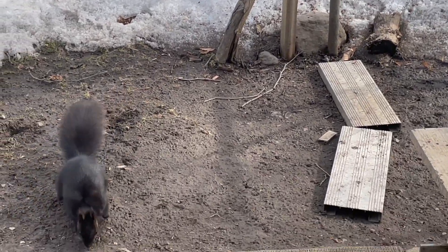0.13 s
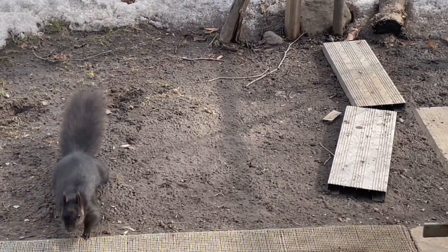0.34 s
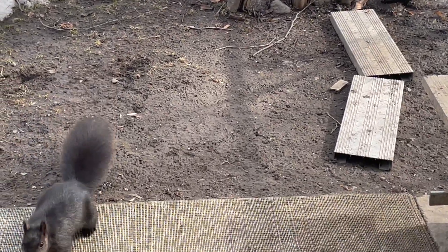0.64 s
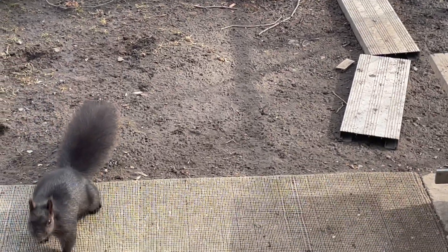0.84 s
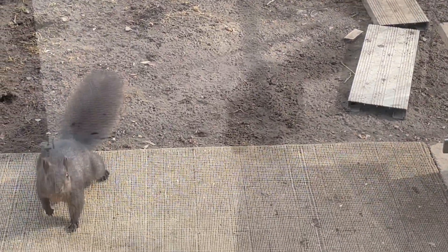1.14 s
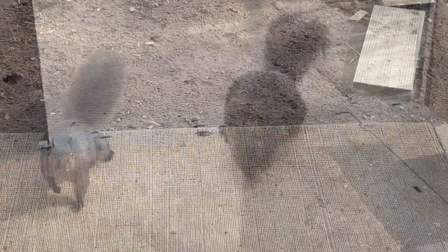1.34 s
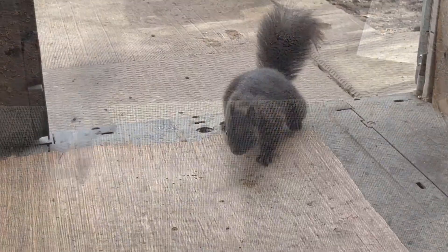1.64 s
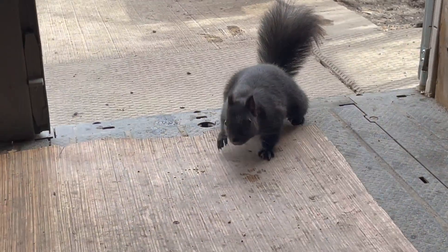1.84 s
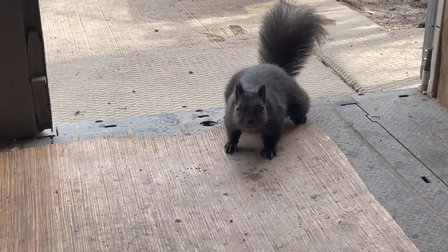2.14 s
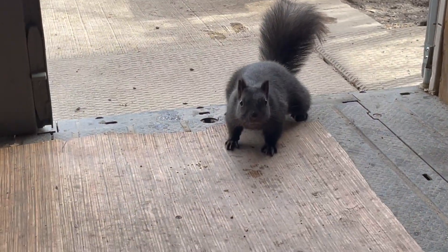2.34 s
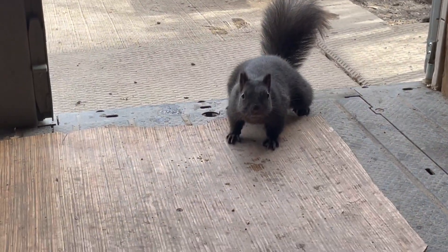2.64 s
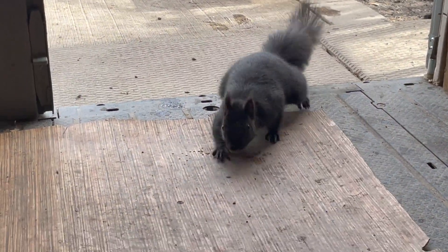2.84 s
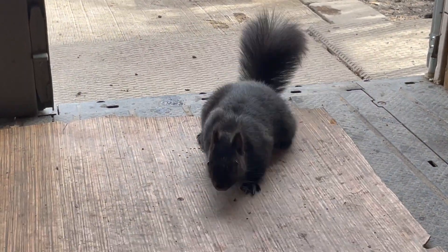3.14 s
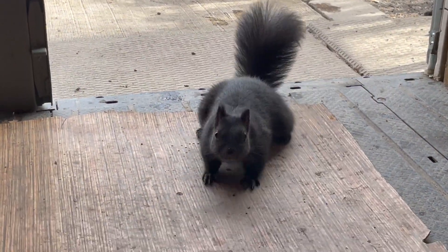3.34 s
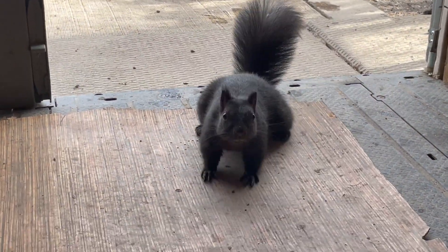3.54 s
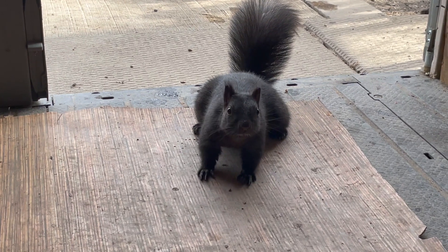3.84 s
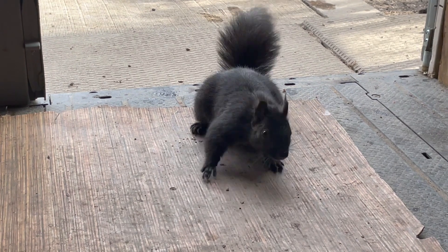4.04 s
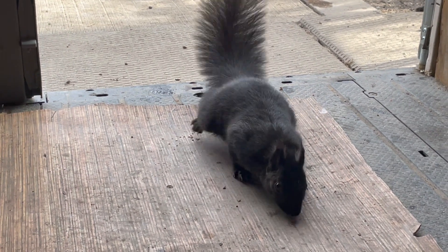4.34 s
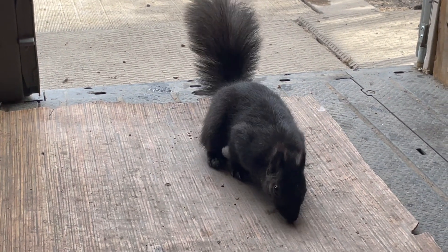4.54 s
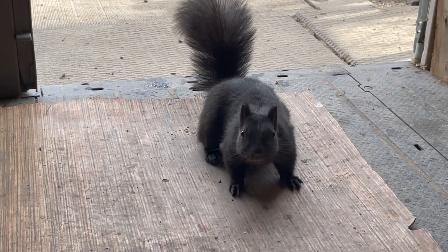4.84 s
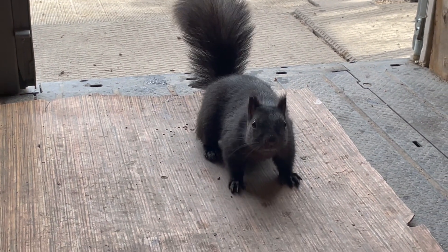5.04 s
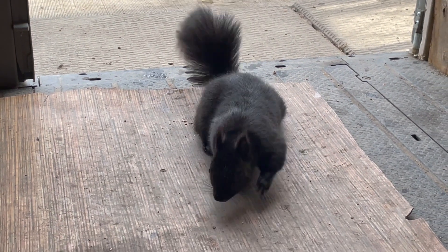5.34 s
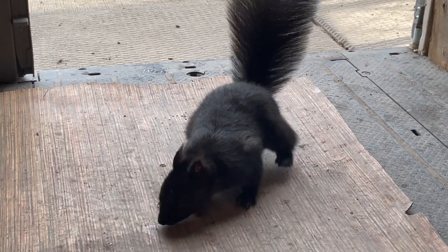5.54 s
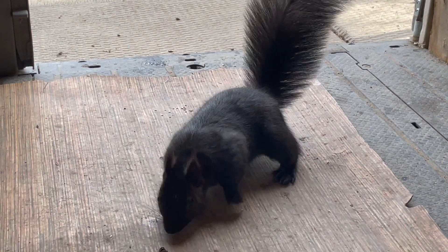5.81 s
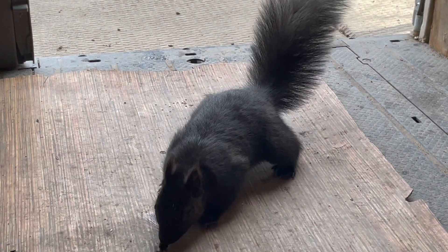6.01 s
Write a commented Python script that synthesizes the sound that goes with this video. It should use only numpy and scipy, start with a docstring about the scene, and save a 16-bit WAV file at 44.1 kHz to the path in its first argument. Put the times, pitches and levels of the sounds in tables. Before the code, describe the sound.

Close stereo pickup of a squirrel: a sharp scratch, a pause, then a dense flurry of gritty claw ticks. After that, irregular soft paw thumps ring a wooden board in a small shed, with occasional claw clicks. Behind it sit quiet traffic wash and low rumble, an engine rising and falling mid-way, then a beating bass drone and tiny distant chirps.

```python
"""Squirrel in a shed door

A squirrel close to a two-port microphone scrabbles over soil and a ribbed mat, then hops on a plywood floor.
Paws are noisy rolls of knocks that ring the board's modes; claws are dense filtered ticks; the shed adds a tail.
Outside, beating tones and wavering engine orders drone and rev past over shaped-noise rumble, traffic wash
and hiss; faint far chirps are short bursts of noise in a loose band."""
import sys
import numpy as np
from scipy import signal
from scipy.fft import rfft, irfft
from scipy.io import wavfile

SR = 44100
rng = np.random.default_rng(int(sys.argv[2]) if len(sys.argv) > 2 else 0)


def makeup_ratio(level_db):
    """Linear amplitude ratio for a level in decibels (20 dB per factor of ten)."""
    decades = np.asarray(level_db, float) / 20
    return 10 ** decades


def transcribe(signal):
    """Save signal, clipped to [-1, 1], as a 16-bit WAV file at the path in sys.argv[1]."""
    frames = np.atleast_2d(signal).T
    limited = np.clip(frames, -1, 1)
    pcm = np.round(limited * 32767).astype(np.int16)
    wavfile.write(sys.argv[1], SR, pcm)


N = 272124   # length in samples

# The outdoors. Each row: time in seconds, then levels in dB of rumble, exhaust roar, the lower band of
# traffic wash, and rustle.
OUTDOOR_LEVELS = [(0.0, -50, -67.5, -58.5, -65), (0.31, -54.5, -56, -62, -79),
                  (0.8, -54, -60.5, -64, -79.5), (1.0, -58.5, -58, -62, -62),
                  (1.3, -54, -61.5, -63.5, -79.5), (1.58, -62, -60, -61.5, -80),
                  (1.74, -53, -53.5, -58.5, -69), (1.95, -53.5, -59, -69, -80), (2.4, -55, -58, -61, -76),
                  (2.56, -43, -56.5, -56, -70), (2.94, -43, -49, -55, -67), (3.4, -45, -59.5, -59, -76),
                  (3.6, -50, -54.5, -61, -78.5), (3.7, -51.5, -62, -71, -80),
                  (4.11, -52.5, -59.5, -68, -78.5), (4.5, -50.5, -59.5, -66.5, -80),
                  (5.26, -47, -59, -68.5, -81.5), (5.4, -49, -54.5, -68, -68.5),
                  (5.59, -46, -61.5, -66.5, -80.5), (6.17, -50.5, -57, -69.5, -81)]
# Spectra of the outdoor layers. Each row: frequency in Hz, relative density in dB per Hz.
RUMBLE_SPECTRUM = [(22, -23), (35, -8), (55, 2), (80, 2.5), (105, -6.5), (150, -13.5)]
ROAR_SPECTRUM = [(80, -16.5), (125, -1), (190, -2), (280, -8.5), (420, -12), (650, -33.5)]
WASH_SPECTRUM = [(300, -1), (480, 3.5), (800, 2.5), (1200, -4), (1700, -6), (2400, -13), (3500, -22.5),
                 (6000, -29.5)]
HISS_SPECTRUM = [(880, -37), (1500, -10.5), (2300, -3), (3400, -5.5), (4700, -7.5), (6600, -7.5),
                 (7000, -22), (8000, -22), (8500, -13), (10500, -15), (12300, -18), (13200, -34),
                 (15500, -41.5)]
STEADY_HISS_DB = -86   # hiss that never changes

# A deep drone of two neighbouring tones that beat. Each row: time in seconds, lower and upper tone in Hz,
# lower and upper level in dB.
DRONE_TONES = [(1.3, 47.5, 59.6, -72, -57), (1.8, 50.1, 58.8, -56, -54.5), (2.2, 50.4, 63.4, -44.5, -69),
               (2.43, 49.9, 63.6, -52.5, -52), (2.55, 50.5, 66.46, -41.5, -41),
               (2.95, 51.94, 68.85, -65, -53.5), (3.3, 52.6, 64.12, -57, -46.5),
               (3.55, 52.75, 59.05, -45.5, -60), (4.1, 53, 58.6, -72, -60),
               (4.3, 53.43, 58.4, -47.5, -47.5), (5.0, 53.21, 58.84, -46.5, -45.5),
               (5.6, 52.8, 58.6, -50.5, -43.5), (6.17, 51.7, 56.7, -61, -57)]
IN_STEP_S = 4.84   # a moment at which the two tones are in step
# Engine revving past outside. Each row: time in seconds, firing rate in Hz, common level of its orders in dB.
ENGINE_REVS = [(1.6, 44.73, -57), (1.92, 45.52, -63), (2.16, 48.8, -52.5), (2.28, 46.93, -51.5),
               (2.78, 62.14, -50), (2.85, 67.9, -67), (2.95, 68.9, -68), (3.43, 59, -55.5),
               (3.58, 52.3, -50.5), (3.7, 50.06, -63)]
# Engine orders. Each row: multiple of the firing rate, level in dB relative to the common level.
ENGINE_ORDERS = [(2, 0.5), (3, -4.5), (4, -13)]
# A far motor that fades out. Each row: time in seconds, level in dB.
HUM_LEVEL = [(0, -72), (1.3, -67.5), (1.6, -81), (6.17, -88)]
HUM_HZ = 197.8
# Faint far chirps. Each row: time in seconds (10 ms after the onset), peak in dB, pitch in Hz.
FAR_CHIRPS = [(1.4895, -57, 2150), (1.6228, -52, 2560), (1.761, -53, 2100), (1.9412, -56, 2480),
              (2.049, -55.5, 2670), (2.1974, -58, 2970), (4.4454, -59, 2420), (4.7234, -55, 2480),
              (4.8738, -59.5, 2530), (4.921, -56, 2470), (5.0672, -61, 2500), (5.19, -61.5, 2460),
              (5.6084, -64, 2370)]
CHIRP_S = 0.047

# Diffuse sound at the two microphone ports. Each row: frequency in Hz, side gain in dB.
PORT_SPREAD = [(60, -16.5), (160, -9.5), (450, -5), (2000, -3), (3200, -11.5), (4000, -20), (6500, -31),
               (6950, 15), (8000, 9), (9800, -4.5), (10800, -19.5), (12200, -23), (13200, 16.5),
               (16000, 12)]
# Near sound at the two microphone ports. Each row: frequency in Hz, phase in radians by which left leads.
PORT_LEAD = [(100, -1.5), (700, 0.5), (1700, 1), (2600, 0), (6500, 0.2), (6850, 4.5), (7600, 5), (9000, 2),
             (10500, -0.2), (12300, -11.2), (13200, -1.5), (14200, -2.5), (16000, 0)]
SHED_T60_S, SHED_DB = 0.2, -13

# Claws on a rough surface. Each row: frequency in Hz, relative density in dB per Hz.
CLAW_SPECTRUM = [(300, -1.5), (585, -5.5), (1070, -0.5), (1300, -8.5), (2200, -3), (3430, -2.5), (4500, -3),
                 (6500, -7), (7400, -19), (8400, -8), (11400, -21), (13000, -17), (14000, -32),
                 (15400, -27), (16200, -47)]
# Claws catching briefly. Each row: peak time in seconds, level in dB, brightest frequency in Hz,
# top-octave level in dB (-16.5 leaves the plain claw spectrum).
CLAW_TICKS = [(0.0111, -49, 3570, -16), (0.0832, -56, 6400, -15), (0.2262, -50, 6500, -16),
              (0.2615, -33, 2970, -16.5), (0.4382, -52, 5030, -12.5), (0.6431, -50.5, 3430, -7.5),
              (0.8277, -39, 4540, -23), (0.892, -39.5, 3260, -19.5), (0.9851, -38.5, 3940, -12.5),
              (1.0253, -36.5, 2940, -19), (1.028, -38.5, 1674, -35.5), (1.04, -42.5, 5900, 0),
              (1.0495, -42, 3280, -27), (1.0851, -40.5, 9100, 2), (1.1599, -49, 5900, -11),
              (1.1918, -55.5, 10930, 1), (1.236, -61, 5630, -5), (1.282, -55.5, 2040, -19),
              (1.3225, -68, 1690, -11), (1.596, -58, 1840, -16), (1.622, -58, 2580, -9.5),
              (1.868, -50, 2180, -15), (2.9088, -45.5, 2500, -11.5), (3.3218, -58, 1706, -7),
              (4.0985, -49, 1978, -32), (4.1848, -55.5, 2130, -17.5), (4.4157, -52.5, 2490, -27),
              (4.651, -61, 3600, -33), (5.2967, -46, 4580, -11), (5.306, -49, 2170, -30),
              (5.329, -52, 2540, -40), (5.4432, -44, 4250, -15), (5.5734, -57.5, 2210, -14),
              (5.765, -55, 2620, -14.5)]
TICK_RISE_MS, TICK_FADE_MS = 5.0, 37
# Claws dragging. Each row: peak time in seconds, level in dB, brightest frequency in Hz, rise in ms,
# fade to -60 dB in ms.
CLAW_DRAGS = [(0.099, -53.5, 3480, 7.8, 150), (0.1255, -44.5, 7200, 43, 66), (0.1472, -44, 5560, 15.2, 89),
              (0.164, -35, 6800, 32.6, 35), (0.19, -47, 4500, 39, 44), (0.6287, -54.5, 2430, 18.3, 140),
              (0.8591, -51.5, 3860, 2.76, 310), (0.9375, -38, 5600, 17, 34), (0.9519, -43, 4150, 34, 48),
              (1.0775, -32.5, 11000, 16.6, 64), (1.1269, -50, 6000, 9, 84), (2.7458, -52, 5760, 13.4, 51),
              (2.8348, -52, 2990, 5.6, 190), (2.9464, -52, 3380, 17, 390), (2.96, -35, 1850, 15.6, 24),
              (3.994, -66, 2620, 28, 130), (4.694, -63, 2130, 56, 99), (5.3596, -61.5, 2400, 18, 56),
              (5.4, -56.5, 2800, 22, 88), (5.439, -47.5, 5500, 10.4, 39), (5.484, -63.5, 5820, 30, 180)]
DRAG_TOP_DB, SQUEAK_HZ, SQUEAK_DB = -15, 8000, 11   # drags brighter than SQUEAK_HZ gain SQUEAK_DB on top
STRAYS, STRAY_DB, STRAY_HZ = 12, -65.5, 2370   # faint scuffs: number, loudest level, central pitch

# Paws landing on the board. Each row: landing in seconds, peak of the push in dB, favoured low pitch in Hz,
# peaks of the middle modes and of the claw-tip modes in dB relative to the push.
PAW_LANDINGS = [(1.723, -52, 231, -26, -6), (1.867, -37.5, 345, -10, -21), (2.844, -25.5, 288, -11.5, 2.5),
                (2.942, -28.5, 275, -19, -14), (3.023, -25.5, 234, -4.5, -6), (3.325, -27, 294, -18, -17.5),
                (3.562, -44.5, 228, -5.5, -6), (3.983, -41, 282, -4, -13.5), (4.1, -31, 280, 1, -1),
                (4.278, -40, 349, -1, -5), (4.289, -35.5, 203, -7.5, -12.5), (4.41, -23.5, 276, -13, -22),
                (4.784, -30.5, 232, -15, -23.5), (5.372, -28.5, 239, -4, 0), (5.503, -25.5, 355, -14, -11),
                (5.575, -37.5, 222, 0.5, -6), (5.858, -30, 420, -4.5, -14)]
# Plywood modes: 7 low, 8 middle, the rest high. Each row: nominal frequency in Hz, nominal level in dB,
# free ring time (t60) in seconds.
BOARD_MODES = [(136, 2, 0.062), (178.7, 0.5, 0.058), (230.5, 0, 0.066), (280, 1.5, 0.075),
               (335, -2.5, 0.04), (349, -0.5, 0.17), (408, -1, 0.097), (485, 1.5, 0.032), (550, -2.5, 0.1),
               (599, -1.5, 0.069), (720, -5.5, 0.025), (785, -9, 0.034), (918, -1, 0.017), (929, -6, 0.035),
               (1056, -14.5, 0.051), (1172, -13, 0.054), (1363, -4.5, 0.071), (1621, 0, 0.038),
               (1850, -3, 0.032), (2130, -1.5, 0.011), (2365, -5, 0.035), (2588, -2, 0.035),
               (2894, -6, 0.029), (3170, -7.5, 0.022)]
RING_CYCLES, DAMPED_S = 15, 0.01   # the resting paw caps a ring at this many cycles plus this time
TIP_LOW_HZ, TIP_HIGH_HZ = 1450, 2100   # range of the pitch that a claw tip favours
BOARD_PAN_DB = -2.5   # left relative to right: the board lies a little to the right


def at_hz(points, hz):
    """Read a spectrum table on a log-frequency axis."""
    p = np.array(points)
    return np.interp(np.log(hz + 1), np.log(p[:, 0] + 1), p[:, 1])


def in_time(rows):
    """Columns of a curve table, one value a sample."""
    s, *columns = np.transpose(rows)
    return [np.interp(np.arange(N) / SR, s, c) for c in columns]


def drift(corner_hz):
    """Slow random wander of spread 1: noise through two equal low-pass poles, drawn every 40 samples."""
    r = np.exp(-2 * np.pi * corner_hz * 40 / SR)
    noise = rng.standard_normal(N // 40 + 2002)
    slow = signal.lfilter([1], [1, -2 * r, r * r], noise)[2000:]   # skip the filter's settling
    slow /= np.sqrt(np.mean(slow ** 2))
    return np.interp(np.arange(N) / 40, np.arange(len(slow)), slow)


def ring(x, hz, t60):
    """A resonator: a unit click sets a decaying sine of starting height 1 ringing."""
    r, w = makeup_ratio(-60 / (t60 * SR)), 2 * np.pi * hz / SR
    return signal.lfilter([0, np.sin(w)], [1, -2 * r * np.cos(w), r * r], x)


def add(out, s, sound, peak_db):
    """Lay a sound into the track at its moment and peak."""
    i = max(round(s * SR), 0)
    part = sound[:N - i] * makeup_ratio(peak_db) / np.max(np.abs(sound))
    out[..., i:i + len(part)] += part


def minimum_phase(gain):
    """The causal filter with this gain, by folding the cepstrum."""
    cepstrum = irfft(np.log(gain + 1e-6))
    cepstrum[1:len(gain) - 1] *= 2
    cepstrum[len(gain):] = 0
    return np.exp(rfft(cepstrum))


def spread(mid_side):
    """Left and right from two unrelated signals, the side coloured by the microphone ports."""
    side_gain = makeup_ratio(at_hz(PORT_SPREAD, np.fft.rfftfreq(N, 1 / SR)))
    mid, side = mid_side[0], irfft(rfft(mid_side[1]) * side_gain, N)
    return np.array([mid + side, mid - side])


def diffuse(spectrum, patchy_db):
    """Shaped noise from all round, mid rms 1 before its level flickers by patchy_db."""
    hz = np.fft.rfftfreq(N, 1 / SR)
    low_cut = np.minimum(hz / spectrum[0][0], 1) ** 3
    shape = makeup_ratio(at_hz(spectrum, hz)) * (hz < spectrum[-1][0]) * low_cut
    noise = irfft(rfft(rng.standard_normal((2, N))) * shape, N)
    return makeup_ratio(patchy_db * drift(9.4)) * spread(noise / np.std(noise[0]))


def outdoors():
    """Rumble, exhaust roar, traffic wash and hiss: bands of diffuse noise, each following its level curve."""
    rumble_db, roar_db, wash_db, rustle_db = in_time(OUTDOOR_LEVELS)
    rumble = makeup_ratio(rumble_db) * diffuse(RUMBLE_SPECTRUM, patchy_db=0.0)
    roar = makeup_ratio(roar_db) * diffuse(ROAR_SPECTRUM, patchy_db=2.2)
    wash_low = diffuse(WASH_SPECTRUM[:4], patchy_db=1.2)
    wash_high = diffuse(WASH_SPECTRUM[3:], patchy_db=2.2)
    wash = makeup_ratio(wash_db) * (wash_low + 0.7 * wash_high)
    hiss_level = np.hypot(makeup_ratio(rustle_db), makeup_ratio(STEADY_HISS_DB))   # powers add
    return rumble + roar + wash + hiss_level * diffuse(HISS_SPECTRUM, patchy_db=0.4)


def far_hum():
    """A far motor: one steady tone with slight wander in level and phase."""
    t = np.arange(N) / SR
    level = makeup_ratio(in_time(HUM_LEVEL)[0] + 2.5 * drift(5.7))
    return np.sqrt(2) * level * np.sin(2 * np.pi * HUM_HZ * t + 0.5 * drift(7.2))


def drone():
    """Two neighbouring low tones throb as they slip in and out of step."""
    low_hz, high_hz, low_db, high_db = in_time(DRONE_TONES)
    phase = 2 * np.pi * np.cumsum([low_hz, high_hz], axis=1) / SR
    phase = phase - phase[:, [int(IN_STEP_S * SR)]] + 0.6 * drift(8.2)
    fade_in = np.clip((np.arange(N) / SR - 1.1) / 0.39, 0, 1)
    return np.sqrt(2) * fade_in * np.sum(makeup_ratio(np.array([low_db, high_db])) * np.sin(phase), axis=0)


def engine():
    """Multiples of the firing rate rise and fall with the revs, wavering as they cross open ground."""
    t = np.arange(N) / SR
    hz, orders_db = in_time(ENGINE_REVS)
    phase = 2 * np.pi * np.cumsum(hz) / SR
    fade = np.clip((t - 1.4) / 0.59, 0, 1) * np.clip((4.0 - t) / 0.33, 0, 1)
    out = np.zeros(N)
    for k, db in ENGINE_ORDERS:
        level = makeup_ratio(orders_db + db + 2.5 * drift(4.2))
        out += fade * level * np.sin(k * phase + 1.67 * drift(6.7))
    return np.sqrt(2) * out


def chirps():
    """Short breathy peeps far off: noise in a loose band."""
    out, t = np.zeros(N), np.arange(SR // 5) / SR
    shape = np.sin(np.pi * np.clip(t / CHIRP_S, 0, 1))
    for s, peak_db, hz in FAR_CHIRPS:
        breath = ring(rng.standard_normal(len(t)), hz, 0.009)
        add(out, s - 0.01, shape * breath, peak_db)
    return out


def shed(x):
    """The walls answer with a dense decaying tail from all round."""
    t = np.arange(SR // 2) / SR
    tail = rng.standard_normal((2, len(t))) * makeup_ratio(-60 * t / SHED_T60_S) * (t > 0.004)
    tail = signal.lfilter([1], [1, -0.5], tail)   # duller than white
    tail /= np.sqrt(np.sum(tail ** 2, axis=1, keepdims=True))
    mono = x.mean(axis=0, keepdims=True)
    return makeup_ratio(SHED_DB) * spread(signal.fftconvolve(mono, tail, axes=1)[:, :N])


def ports(x):
    """A near source reaches the two microphone ports with a phase step that depends on pitch."""
    half = at_hz(PORT_LEAD, np.fft.rfftfreq(N, 1 / SR)) / 2
    return irfft(rfft(x) * np.exp(1j * np.array([half, -half])), N)


def claw_rows():
    """Ticks, drags and random strays as rows (s, dB, brightest Hz, top dB, rise ms, fade ms)."""
    rows = [(*row, TICK_RISE_MS, TICK_FADE_MS) for row in CLAW_TICKS]
    for s, db, hz, rise, fade in CLAW_DRAGS:
        rows.append((s, db, hz, DRAG_TOP_DB + SQUEAK_DB * (hz > SQUEAK_HZ), rise, fade))
    busy = np.cumsum(makeup_ratio(in_time(OUTDOOR_LEVELS)[-1] / 2))   # strays are likelier where the rustle is loud
    for when, size, pitch, length in rng.random((STRAYS, 4)):
        s = np.searchsorted(busy, when * busy[-1]) / SR
        hz = STRAY_HZ * 2 ** (pitch - 0.5)
        rows.append((s, STRAY_DB - 4.3 * size, hz, DRAG_TOP_DB, 5 + 30 * length, 30 + 120 * length))
    return rows


def scratches():
    """Claw tips skip over the grain: dense uneven ticks swell, catch once and fade, leaving a faint drag."""
    size = 8192
    out = np.zeros(N + size)
    ms, hz = np.arange(size) / SR * 1000, np.fft.rfftfreq(size, 1 / SR)
    for s, level_db, bright_hz, top_db, rise, t60 in claw_rows():
        rise, t60 = max(rise, 0.5), max(t60, 10)
        born, big, sign = rng.random((3, size))
        # the tick rate stutters as the claw slips and holds
        chance = 0.1 * 2 ** np.sin(ms * (0.7 + born[1]) + 6 * born[0])
        height = np.minimum((1 - big) ** -0.35, 6)   # many small ticks, few large
        ticks = (born < chance) * height * np.sign(sign - 0.5)
        ticks[np.argmin(abs(ms - rise))] = 2.4   # the catch
        after = np.maximum(ms - rise, 0)
        fade = makeup_ratio(-60 * after / t60) + 0.082 * makeup_ratio(-60 * after / 125.0)
        swell = np.minimum(ms / rise, 1) ** 1.34 * fade
        hump_db = 9.0 * np.exp(-(np.log2((hz + 1) / bright_hz) / 0.25) ** 2)
        tilt_db = (top_db + 16.5) * np.clip(np.log2((hz + 1) / 5000), -0.6, 1)
        colour = makeup_ratio(at_hz(CLAW_SPECTRUM, hz) + hump_db + tilt_db) * np.minimum(hz / 300, 1) ** 2
        sound = irfft(rfft(swell * ticks) * minimum_phase(colour), size)
        # the pad drags a little later and duller
        scuff = signal.lfilter([1], [1, -1.6, 0.68], np.roll(swell, 180) ** 0.84 * ticks)
        sound += makeup_ratio(-12.5) * scuff * np.std(sound) / np.std(scuff)
        i = max(round((s - rise / 1000) * SR), 0)
        out[i:i + size] += makeup_ratio(level_db) * sound * np.sqrt(np.sum(swell ** 2) / np.sum(sound ** 2))
    return out[:N]


def favour(modes, rings, hz):
    """Sum ringing modes, 8 dB weaker per octave away from the favoured pitch."""
    return sum(makeup_ratio(-8.0 * abs(np.log2(f / hz))) * r for (f, _, _), r in zip(modes, rings))


def paws():
    """Toes land in a quick uneven roll that rings the hollow board; the spot struck favours one pitch."""
    out, size = np.zeros(N), SR // 6
    t = np.arange(size) / SR
    for s, peak_db, hz, mid_db, tip_db in PAW_LANDINGS:
        # fur and grit rub while the paw settles
        roll = 0.068 * rng.standard_normal(size) * np.exp(-t / 0.012)
        knock_s = np.r_[0, rng.random(7)] ** 1.5 * 0.009
        roll[(knock_s * SR).astype(int)] += np.r_[1.2, 1.5 * rng.random(7) - 0.5]
        rings = []
        for k, (f, db, t60) in enumerate(BOARD_MODES):
            height = makeup_ratio(db + 4.8 * (rng.random() - 0.5)) * (-1) ** k
            mode_hz = f * (1 + 0.082 * (rng.random() - 0.5))
            rings.append(height * ring(roll, mode_hz, min(t60, RING_CYCLES / f + DAMPED_S)))
        low = favour(BOARD_MODES[:7], rings[:7], hz)
        push = signal.lfilter([1], [1, -0.9], low)   # pads are soft: the push is rounded
        tip = favour(BOARD_MODES[15:], rings[15:], rng.uniform(TIP_LOW_HZ, TIP_HIGH_HZ))
        add(out, s - 0.0035, push, peak_db)
        add(out, s - 0.003, sum(rings[7:15]), peak_db + mid_db)
        add(out, s - 0.003, tip, peak_db + tip_db)
    return out * makeup_ratio([[BOARD_PAN_DB / 2], [-BOARD_PAN_DB / 2]])


def scene():
    """Squirrel close by in the shed, the outdoors around it."""
    background = outdoors() + far_hum() + drone() + engine() + chirps()
    squirrel = scratches() + paws()
    return background + shed(squirrel) + ports(squirrel)


def band_limit(x):
    """A steep low-pass at the top of the band."""
    return signal.sosfilt(signal.butter(12, 16420, fs=SR, output="sos"), x)


def record(dry):
    """Take the finished mix from the microphone to the file's signal."""
    return band_limit(dry)


dry = scene()
out = record(dry)
transcribe(out)
```